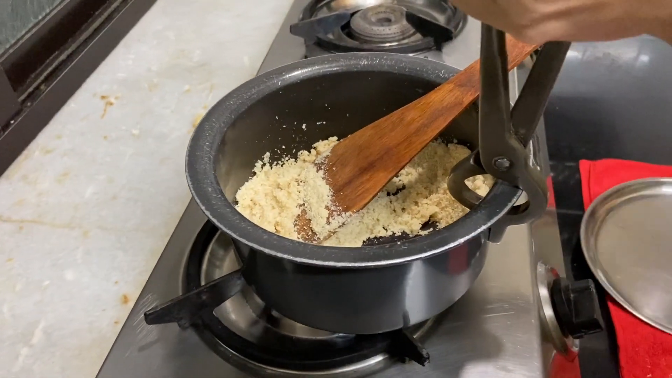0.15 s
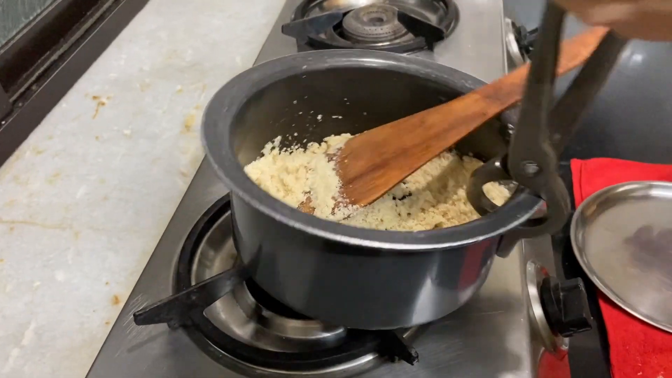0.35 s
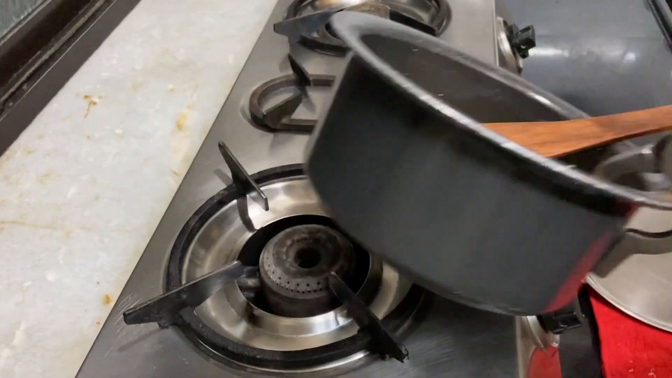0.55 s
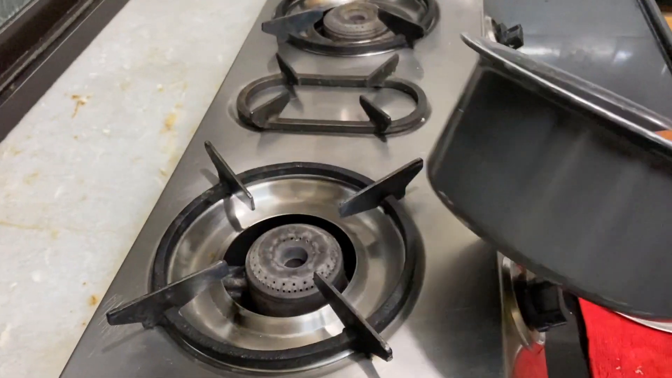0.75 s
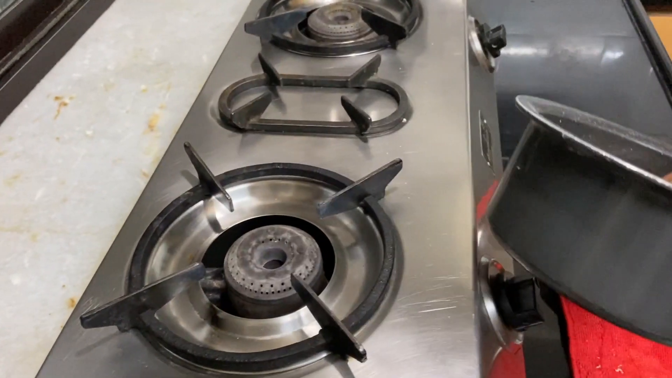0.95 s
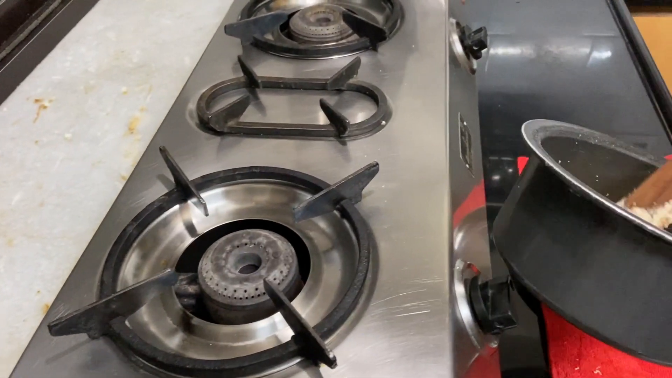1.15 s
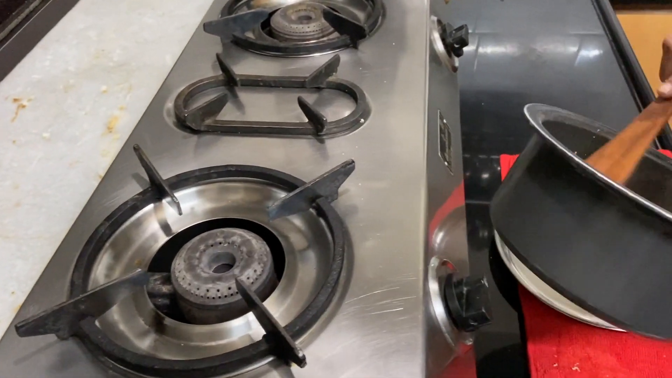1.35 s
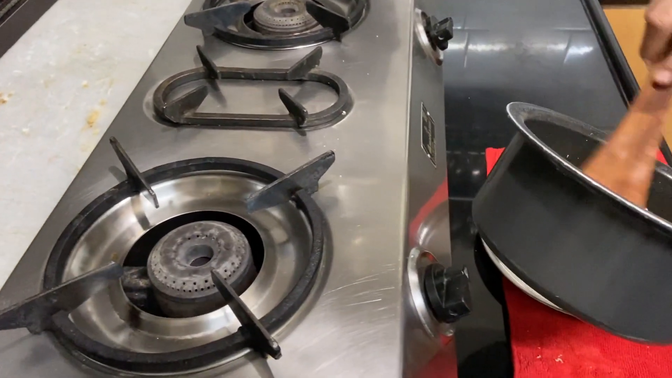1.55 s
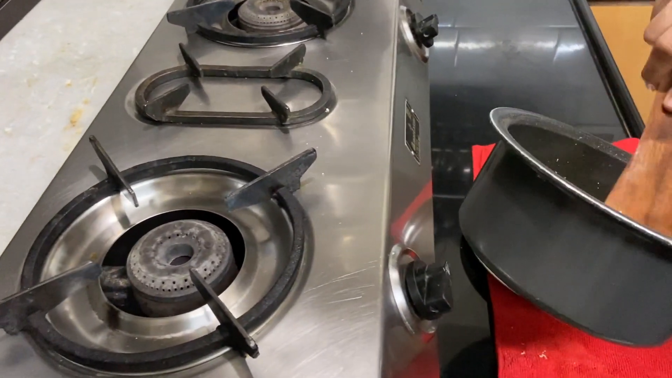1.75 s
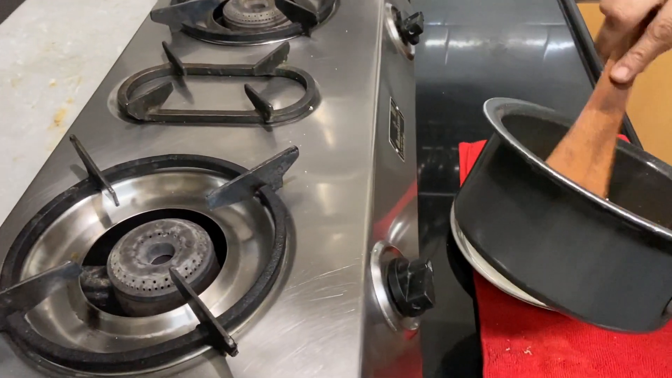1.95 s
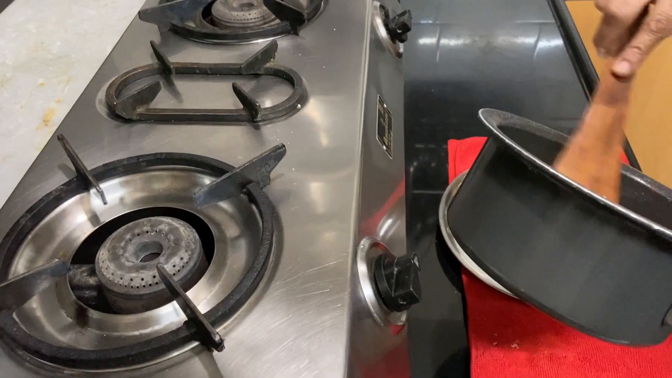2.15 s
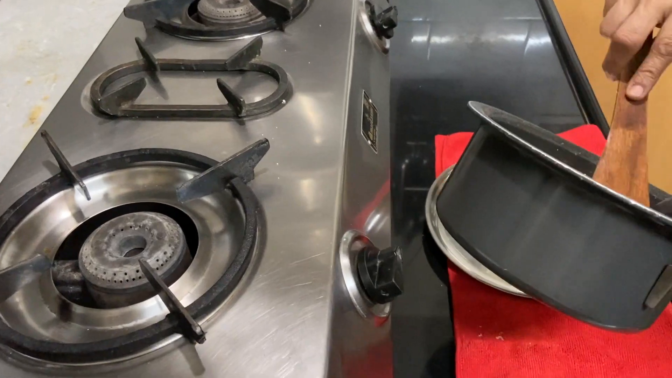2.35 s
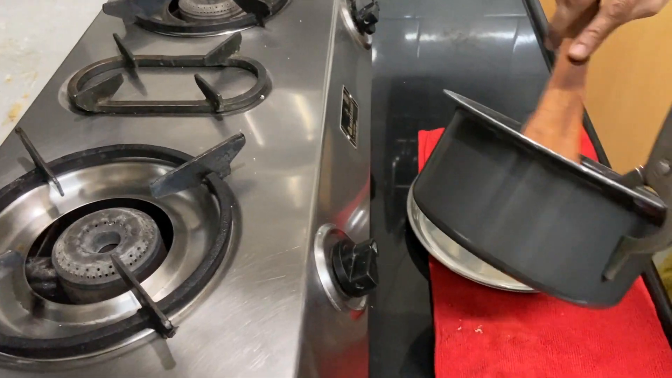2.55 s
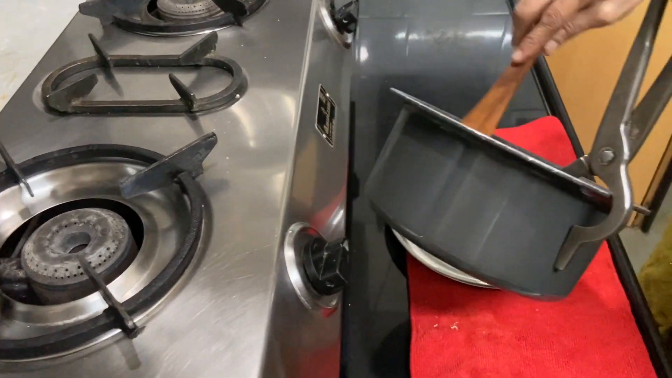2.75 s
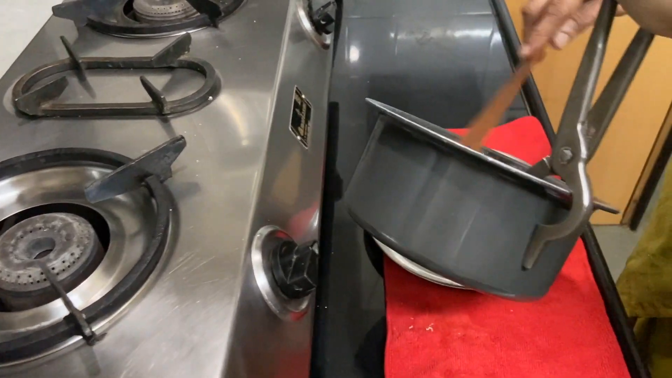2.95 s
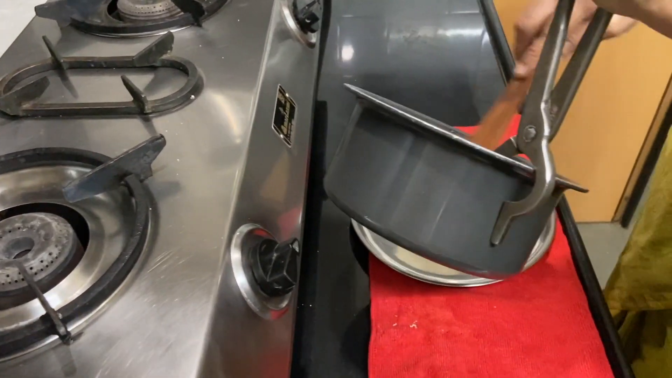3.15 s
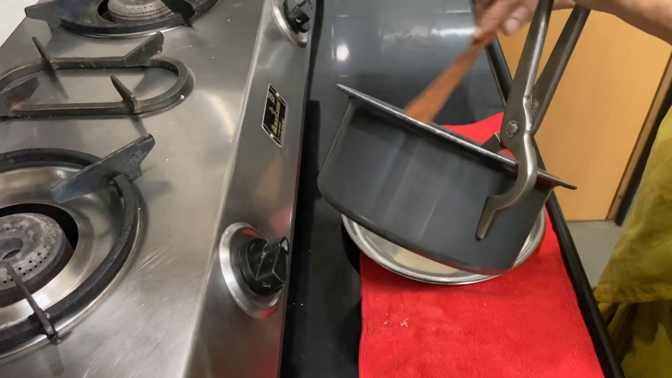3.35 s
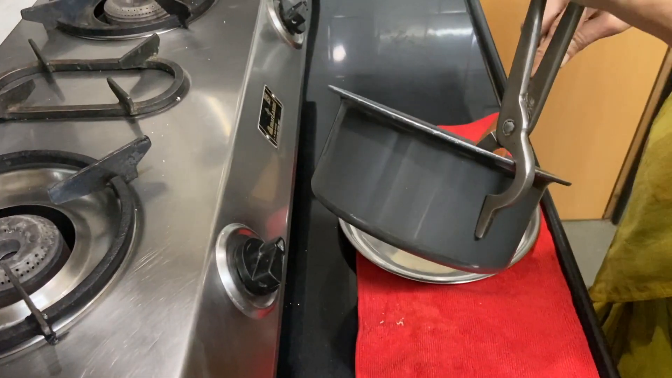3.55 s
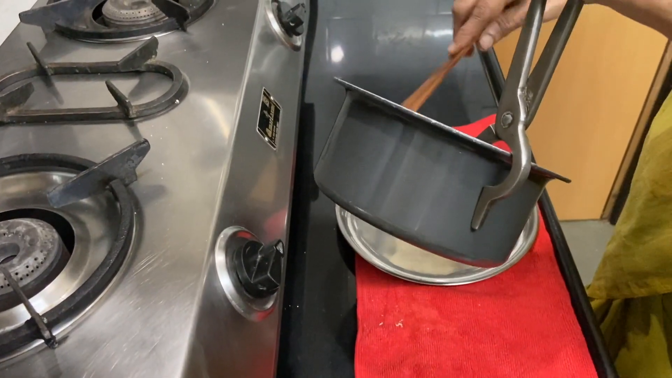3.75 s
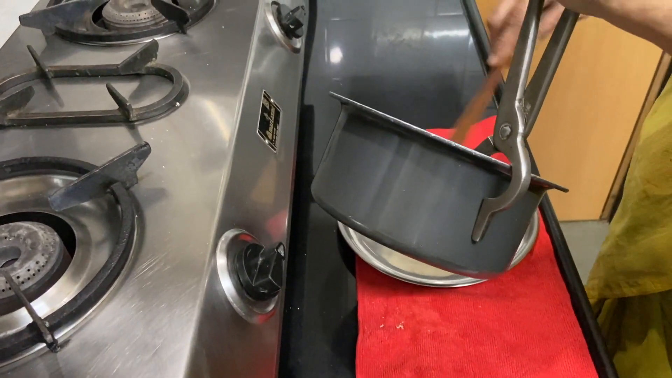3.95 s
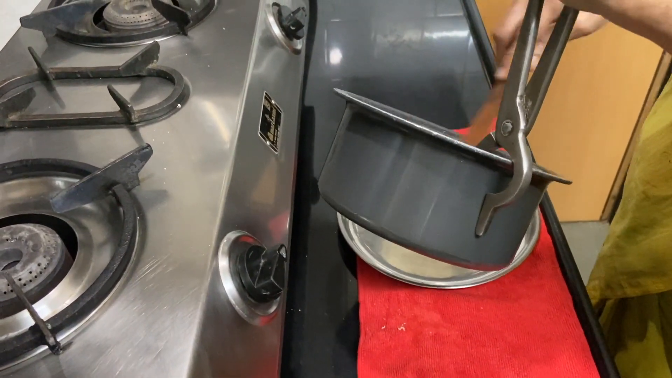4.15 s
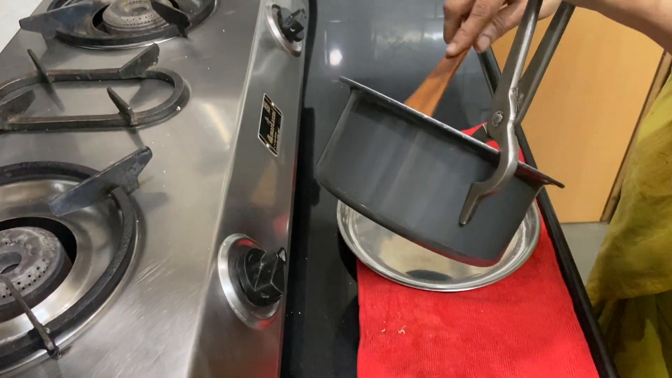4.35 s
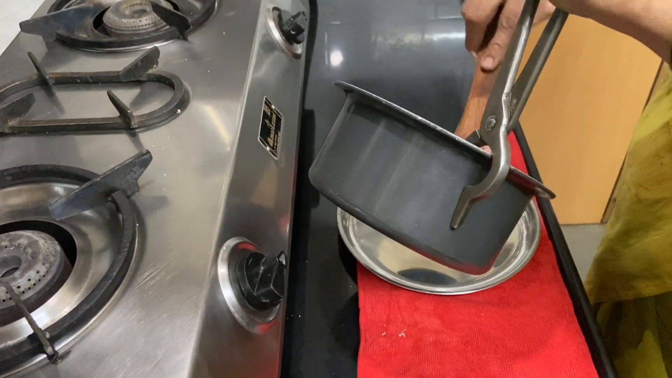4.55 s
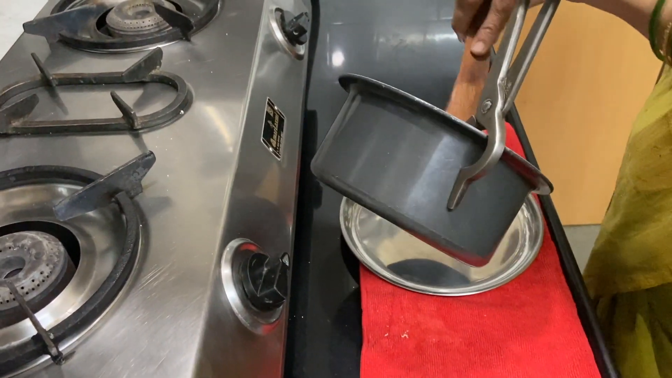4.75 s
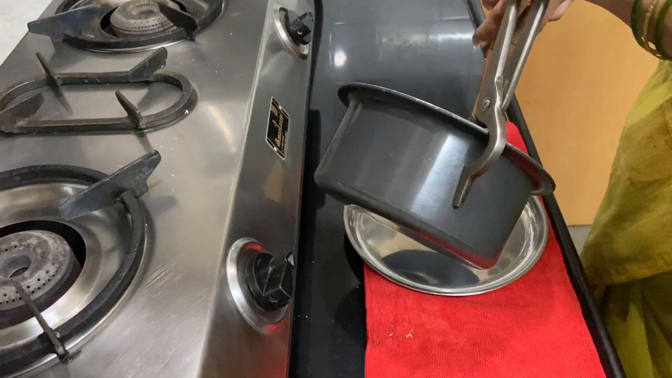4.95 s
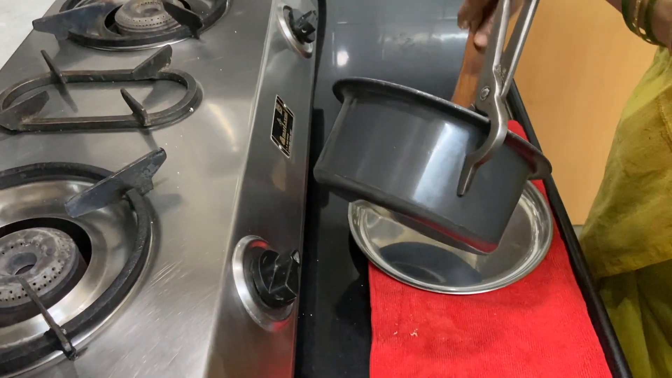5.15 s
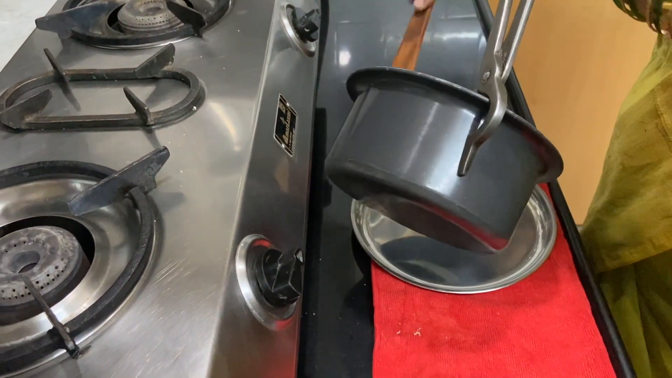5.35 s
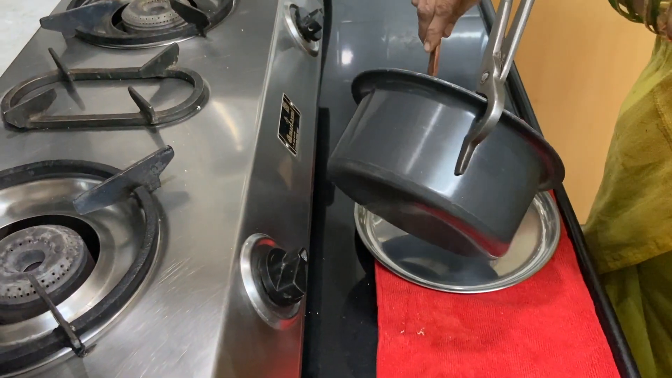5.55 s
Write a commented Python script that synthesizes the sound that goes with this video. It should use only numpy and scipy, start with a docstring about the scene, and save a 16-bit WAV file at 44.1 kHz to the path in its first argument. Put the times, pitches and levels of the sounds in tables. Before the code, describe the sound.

A wooden spatula scrapes dry, hissing grain from a thin metal pan in short strokes, with juddering, small squeaks and knocks in a quiet kitchen.

```python
"""Semolina scraped from a pan

A pan of roasted semolina is lifted off a gas stove with tongs and scraped out onto a steel plate in a small
kitchen, heard by a close pair of microphones. Strokes of a wooden spatula push hissing grain (filtered random
impacts), judder and squeak over the metal (slips driving damped modes) and knock on the pan wall (struck modes).
Between strokes pinches of grain patter down; kitchen air, handling rustle and a faint hum lie beneath."""
import sys
import numpy as np
from scipy import signal
from scipy.fft import rfft, irfft
from scipy.io import wavfile
from scipy.ndimage import uniform_filter1d

SR = 44100
rng = np.random.default_rng(int(sys.argv[2]) if len(sys.argv) > 2 else 0)


def unload_wav(signal):
    """Save mono or channel-first audio to the path in sys.argv[1] as 16-bit WAV at rate SR, clipped to [-1, 1]."""
    wavfile.write(
        sys.argv[1],
        SR,
        np.round(np.clip(np.atleast_2d(signal).T, -1, 1) * 32767).astype(np.int16),
    )


N = 247842
TIME, BINS = np.arange(N) / SR, np.fft.rfftfreq(N, 1 / SR)  # s, Hz

# Modes of the pan, damped by the tongs. Each row: pitch in Hz, relative level in dB, t60 in seconds.
PAN_MODES = [(291, -13, .22), (570, -4, .07), (738, 1, .17), (790, -5, .13), (1150, -7, .16),
             (1200, -6, .13), (1360, -13, .12), (1525, -9, .14), (1775, -12, .11), (1962, -6, .18),
             (2137, -7, .16), (2270, -9, .1), (2730, -13, .13), (2990, -12, .13), (3320, -7, .1),
             (3570, -9, .08), (4555, -12, .12), (4840, -12, .11), (4950, -11, .11), (5570, -11, .07),
             (6500, -11, .07), (6815, -8, .09), (7040, -8, .07)]
# Dense, short-lived vibration of blade and pan wall. Each row: frequency in Hz, relative density in dB per Hz.
CLATTER_SPECTRUM = [(30, -77), (110, -17.5), (220, 8), (450, 2.5), (750, 11), (1400, -5), (2100, 5),
                    (2600, -3), (3400, 2.5), (5000, -5.5), (8000, -14), (16000, -14.5)]


def gain_of(db):
    """Decibels are twenty times the logarithm of an amplitude ratio."""
    return 10 ** (np.asarray(db) / 20)


def evened(x):
    """Division by the root mean square gives unit power."""
    return x / np.sqrt(np.mean(x ** 2) + 1e-20)


def read(points, hz):
    """Interpolation of (Hz, value) rows on a logarithmic frequency axis."""
    f, value = np.transpose(points)
    return np.interp(np.log(hz + 1), np.log(f + 1), value)


def add(mix, s, sound):
    """Superposition: a sound starting at s seconds is summed into the mix."""
    part = mix[:, round(s * SR):][:, :sound.shape[1]]
    part += sound[:, :part.shape[1]]


def coloured(x, points, size=2048):
    """Minimum-phase filter: the Hilbert transform of the log gain (Hz, dB rows) supplies a causal phase."""
    log_gain = np.log(gain_of(read(points, abs(np.fft.fftfreq(size, 1 / SR)))))
    response = np.exp(np.conj(signal.hilbert(log_gain)))
    taps = np.fft.ifft(response).real
    return signal.fftconvolve(x, taps[None], axes=1)[:, :x.shape[1]]


def paired(x, points):
    """Partial coherence: two unrelated signals mix into a stereo pair of the given spectrum."""
    # Left-right likeness of the pair. Each row: frequency in Hz, likeness from 0 to 1.
    likeness = [(60, 0.97), (300, 0.74), (900, 0.18), (5600, 0.51), (7000, 0.42), (16000, 1)]
    a, b = rfft(x)
    same = np.clip(read(likeness, BINS), 0, 1)
    right = same * a + np.sqrt(1 - same ** 2) * b
    return evened(irfft(np.array([a, right]) * gain_of(read(points, BINS)), N))


def grit(per_s, spread_db, clump_db, count=N):
    """A random impact process: tiny blows of uneven size whose strength clumps over a few milliseconds."""
    clump_s = 0.0075
    slow_noise = signal.lfilter([1], [1, -np.exp(-1 / (clump_s * SR))], rng.standard_normal(count))
    clumps = np.clip(evened(slow_noise), -2, 2)
    unevenness = np.minimum(rng.exponential(1, count), 4)
    size = gain_of(spread_db * unevenness + clump_db * clumps)
    return rng.standard_normal((2, count)) * size * (rng.random(count) < per_s / SR)


def patchy(x, patchy_db):
    """Patchy noise: random patches of time and frequency, a few hundredths of a second long, vary in level."""
    z = signal.stft(x, SR, nperseg=256)[2]
    patches = uniform_filter1d(rng.standard_normal(z.shape[1:]), size=6, axis=0)  # across frequency
    patches = evened(uniform_filter1d(patches, size=8, axis=1))  # across time
    return evened(signal.istft(z * gain_of(patchy_db * patches), SR, nperseg=256)[1][:, :N])


def contact(x, hz, slope):
    """Contact filtering: where and how hard surfaces meet favours one pitch; the rest falls by the octave."""
    knee = .15  # octaves over which the peak is rounded
    points = []
    for f in np.geomspace(SR / 2 ** 10, SR / 2, num=120):
        octaves = np.hypot(np.log2(f / hz), knee)
        points.append((f, max(-abs(slope) * octaves, -70)))
    return coloured(x, points)


def ringing(modes, apart):
    """Modal decay after one tap; each mode reaches the two microphones with its own strength and phase."""
    t = np.arange(SR // 4) / SR
    skew = apart * rng.uniform(-0.43, 1, (len(modes), 1, 1)) * [[1], [-1]]
    ring = 0
    for (hz, db, t60), phase in zip(modes, skew):
        onset = 1 - np.exp(-2 * hz * t)
        ring = ring + gain_of(db - 60 * t / t60) * (1 + phase / 2) * np.sin(2 * np.pi * hz * t + phase) * onset
    # small things radiate no deep bass
    return evened(signal.sosfilt(signal.butter(2, 130, "high", fs=SR, output="sos"), ring))


def body(modes, dense, dense_db, dense_t60, crack):
    """Impulse response of a metal body: separate modes, a crack and a short dense clatter."""
    t = np.arange(SR // 4) / SR
    noise = rng.standard_normal(len(t)) + rng.standard_normal((2, len(t)))
    clatter = evened(noise * gain_of(-60 * t / dense_t60))
    impulse = evened(1. * (t == 0))
    short = evened(coloured(clatter + crack * impulse, dense))
    return ringing(modes, apart=1.0) + gain_of(dense_db) * short


def rubs(rows, modes, dense, dense_db, dense_t60, rise_s, fade_db):
    """Stick-slip friction: irregular slips under changing pressure drive the modes of a metal body."""
    loading = 0.013  # the place of contact shifts the body's pitches by up to this share
    out = np.zeros((2, N))
    for s, length, db, hz, slope in rows:
        count = int(np.clip(length * SR, 64, SR // 4))
        t = TIME[:count]
        pressure = np.minimum(t / rise_s, 1) * gain_of(-fade_db * t / length)
        pressure = pressure * signal.windows.tukey(count, .1)
        slips = grit(per_s=5000, spread_db=1.2, clump_db=2, count=SR // 4)[:1, :count] * pressure
        shift = 1 + loading * rng.uniform(-0.99, 1)
        loaded = [(f * shift, level, t60) for f, level, t60 in modes]
        answer = body(loaded, dense, dense_db, dense_t60, crack=0.1)
        sound = contact(signal.fftconvolve(slips, answer, axes=1), hz, slope)
        rms = np.sqrt(np.sum(sound ** 2) / (2 * count))  # total energy spread over the contact time
        add(out, s, gain_of(db) * sound / rms)
    return out


def background():
    """Stationary noise for the kitchen air, and a low handling rustle whose power rises with each move."""
    # The quiet kitchen. Each row: frequency in Hz, relative density in dB per Hz.
    air_spectrum = [(15, -87.5), (25, -22), (92, -11), (134, -57.5), (161, 0.5), (285, -6.5), (326, -32.5),
                    (463, -24.5), (545, -8.5), (1560, -20), (2220, -22), (6380, -31.5), (6920, -27),
                    (8590, -40), (16000, -33.5)]
    # Rustle of hands and tongs. Each row: frequency in Hz, relative density in dB per Hz.
    rustle_spectrum = [(30, -24), (80, 7), (170, 5), (300, 2.5), (600, -4), (1200, -15), (16000, -28)]
    # Hands and tongs at work. Each row: start in seconds, length in seconds, level in dB before the waver.
    moves = [(-.1, 0.74, -65.5), (1.28, 5.84, -67), (2.707, 0.52, -64.5), (3.534, 0.43, -61),
             (4.043, 0.5, -72)]
    hold_db, ramp_s, waver_db = -74.5, 0.068, 1  # just holding the pan; ease in and out; unevenness
    air = gain_of(-74.0) * paired(rng.standard_normal((2, N)), air_spectrum)
    power = gain_of(hold_db) ** 2
    for s, length, db in moves:
        ramp = np.clip(np.minimum(TIME - s, s + length - TIME) / ramp_s, 0, 1)
        power = power + (gain_of(db) * ramp) ** 2
    rates = np.geomspace(2, 10, num=8)  # Hz
    waver = evened(sum(np.sin(2 * np.pi * (per_s * TIME + rng.random())) for per_s in rates))
    rustle = paired(rng.standard_normal((2, N)), rustle_spectrum)
    return air + np.sqrt(power) * gain_of(waver_db * waver) * rustle


def hum():
    """Steady sinusoids of a faint appliance hum, alike at both microphones."""
    # Each row: frequency in Hz, RMS level in dB.
    lines = [(96.9, -77.5), (172.3, -88.5), (199.2, -76)]
    return sum(np.sqrt(2) * gain_of(db) * np.sin(2 * np.pi * (hz * TIME + rng.random())) for hz, db in lines)


def spills():
    """Granular impacts with exponential decay: a pinch of grain lands together, then stragglers trickle."""
    # Pinches of grain landing. Each row: start in seconds, level in dB ahead of the bowl, t60 in seconds.
    pinches = [(.203, -56.5, 0.096), (.292, -51.5, 0.11), (.485, -58, 0.039), (1.202, -53, .11),
               (1.898, -49, 0.19), (1.97, -35, 0.11), (2.206, -47.5, 0.12), (2.22, -34, 0.18),
               (2.512, -37.5, 0.15), (2.62, -35.5, 0.16), (2.662, -47, .13), (2.903, -48, 0.048),
               (3.322, -45.5, .13), (3.455, -37, 0.28), (3.672, -42.5, 0.13), (3.942, -50.5, 0.03),
               (4.009, -49, 0.15), (4.314, -49.5, .13), (4.589, -40, 0.021), (5.507, -34, 0.19)]
    # Patter of landing grain. Each row: frequency in Hz, relative density in dB per Hz.
    patter_spectrum = [(300, -40), (1500, -23.5), (4000, -20.5), (7000, -9), (9000, -8), (11000, -1),
                       (16000, -1)]
    flow = np.zeros(N)
    for s, db, t60 in pinches:
        rise = 0.067 * t60  # the pinch lands in this share of its dying time
        flow += np.clip((TIME - s) / rise, 0, 1) * gain_of(db - 60 * np.maximum(TIME - s - rise, 0) / t60)
    patter = paired(grit(per_s=6000, spread_db=2.0, clump_db=1.9), patter_spectrum)
    return flow * patchy(patter, patchy_db=1.5)


def knocks():
    """Impact excitation: single blows set off the pan's modes, each scaled by its first 20 ms."""
    # Wood and tongs on the pan. Each row: start in seconds, level over the first 20 ms in dB ahead of the
    # stereo balance, strongest pitch in Hz, fall-off in dB per octave.
    blows = [(.2664, -56.5, 9400, 14.5), (.5095, -54.5, 11500, 25), (1.9731, -33.5, 600, 16.5),
             (2.2705, -40.5, 3360, 7), (2.6245, -48.5, 1500, 1.5), (2.6339, -36, 650, 8),
             (2.7672, -33, 1220, 3), (3.7975, -35, 3330, 3), (3.808, -38.5, 474, 14.5),
             (4.3945, -32, 1060, 6.5), (5.4827, -25, 2840, 5.5)]
    out = np.zeros((2, N))
    for s, db, hz, slope in blows:
        hit = body(PAN_MODES, CLATTER_SPECTRUM, dense_db=6.0, dense_t60=.032, crack=0.32)
        hit = contact(hit, hz, slope)
        add(out, s, gain_of(db) * hit / hit[:, :SR // 50].std())
    return out


def drags():
    """Friction-driven modes: the pan drags over the burner grate as it lifts, and later shifts on the plate."""
    # Each row: start in seconds, length in seconds, level in dB, strongest pitch in Hz,
    # fall-off in dB per octave.
    rows = [(.32, 0.037, -56, 890, 4), (.34, 0.041, -43.5, 304, 6), (.365, 0.04, -37, 365, 8),
            (.422, 0.014, -36, 432, 24), (.443, 0.016, -40, 430, 26), (.454, 0.039, -52, 442, 44),
            (3.62, .13, -63, 196, 11)]
    # Modes of the grate and stove top. Each row: pitch in Hz, relative level in dB, t60 in seconds.
    grate_modes = [(173, -5, .1), (280, -1, .12), (359, 0, .1), (441, -1, .2), (540, -5, .06),
                   (620, -5, .07), (690, -9, .06)]
    # Dense low vibration. Each row: frequency in Hz, relative density in dB per Hz.
    thud_spectrum = [(40, -13), (150, -8), (350, -10), (650, -24.5), (900, -28), (2000, -41), (16000, -51)]
    return rubs(rows, grate_modes, thud_spectrum, dense_db=2.0, dense_t60=0.073, rise_s=0.0056, fade_db=3)


def push(start, length, rise, db, sag_db):
    """Envelope of a driven flow: the blade speeds up, the heap thins out, and the grain settles after."""
    release_t60 = .15  # s
    t = np.maximum(TIME - start, 0)
    held = np.clip((t - rise) / max(length - rise, 1 / SR), 0, 1)
    settling_db = 60 * np.maximum(t - length, 0) / release_t60
    return np.minimum(t / rise, 1) ** 2 * gain_of(db - sag_db * held - settling_db)


def sliding_grain():
    """Granular flow: grain ahead of the blade fizzes and crunches, and its many impacts make the pan sing."""
    # Pushes of the blade. Each row: start, length and rise in seconds, fizz level, crunch level
    # and sag over the push in dB, levels ahead of the bowl.
    pushes = [(1.077, 0.046, 0.035, -50.5, -53.5, 1.5), (1.327, 0.1, 0.038, -43, -50, 4.5),
              (1.426, 0.17, 0.033, -45, -51.5, 9.5), (1.652, 0.037, 0.027, -41, -44, 3),
              (1.739, 0.073, 0.014, -38, -47, 10.5), (2.008, 0.11, 0.037, -44, -52.5, 5.5),
              (2.265, 0.038, .006, -44, -45, 8.5), (2.295, 0.14, 0.011, -34, -39, 20),
              (2.684, 0.22, 0.056, -38, -38.5, 29.5), (3.08, 0.036, 0.022, -44.5, -45.5, 4),
              (3.118, 0.13, 0.04, -42, -44, 5.5), (3.431, .145, 0.055, -47, -50.5, -2),
              (3.752, 0.18, 0.028, -41, -43.5, 19), (4.06, 0.048, 0.029, -43.5, -45, 7),
              (4.105, 0.13, 0.032, -39, -45, 16), (4.402, 0.14, 0.08, -46.5, -51, 0),
              (4.702, 0.052, 0.021, -56.5, -61, -3.5), (4.739, 0.1, 0.021, -33, -41, 13.5),
              (4.814, 0.049, 0.01, -28.5, -38, 2), (4.83, 0.16, 0.017, -28, -50.5, 1),
              (4.889, 0.1, 0.046, -27.5, -32.5, -1.5), (4.996, 0.096, 0.016, -29.5, -43, 8.5),
              (5.174, 0.13, 0.019, -81.5, -78.5, -2), (5.42, .12, 0.029, -47, -45, 5.5)]
    # Fine fizz, then coarse crunch. Each row: frequency in Hz, relative density in dB per Hz.
    fizz_spectrum = [(300, -37), (900, -20), (2800, -20.5), (5000, -8.5), (6000, -8), (7000, 4.5),
                     (7800, -1), (9000, -3), (11000, 2.5), (12500, -2.5), (16000, -1)]
    crunch_spectrum = [(500, -46), (1500, -15), (2200, -4.5), (2800, -12), (3400, -0.5), (4100, -1),
                       (4900, -0.5), (5600, 0), (7000, -3.5), (16000, -35.5)]
    fine, coarse = np.zeros((2, N))
    for start, length, rise, fizz_db, crunch_db, sag_db in pushes:
        fine = np.maximum(fine, push(start, length, rise, fizz_db, sag_db))
        coarse = np.maximum(coarse, push(start, length, rise, crunch_db, 0.99 * sag_db))
    fizz = paired(grit(per_s=16000, spread_db=1.3, clump_db=1.84), fizz_spectrum)
    fizz = fine * patchy(fizz, patchy_db=3.5)
    crunch = paired(grit(per_s=11000, spread_db=2.8, clump_db=2.4), crunch_spectrum)
    crunch = coarse * patchy(crunch, patchy_db=2.0)
    # larger roasted crumbs crack under the blade
    crumbs = paired(grit(per_s=590, spread_db=3.5, clump_db=1.5), crunch_spectrum)
    crunch = crunch + gain_of(-10.5) * coarse * crumbs
    ring = ringing(PAN_MODES, apart=0.94)
    singing = signal.fftconvolve((fizz + crunch)[:1], ring / np.linalg.norm(ring[0]), axes=1)[:, :N]
    # the moving blade and the shifting heap load the pan, so its pitches wander by a few percent
    wander = np.zeros(N)  # time shift in s
    for per_s in (1.3, 2.9, 7.1):
        wander += .02 / (2 * np.pi * per_s) * np.sin(2 * np.pi * (per_s * TIME + rng.random()))
    singing = np.array([np.interp(TIME + wander, TIME, channel) for channel in singing])
    return fizz + crunch + gain_of(-8) * singing


def squeaks():
    """Selective friction: as the blade runs up the wall, slips favour one pitch and a band below its octave."""
    # Each row: start in seconds, length in seconds, level in dB ahead of the stereo balance, pitch in Hz,
    # level of the upper band relative to it in dB.
    squeak_rows = [(1.094, 0.048, -48.5, 1156, -8.5), (3.144, 0.14, -53, 3660, -10),
                   (3.197, 0.038, -44.5, 1274, 3.5), (3.354, 0.085, -63.5, 890, -16),
                   (3.506, 0.043, -48.5, 3300, -24), (3.55, 0.033, -42, 1194, -5),
                   (3.858, 0.057, -37.5, 1288, -6), (4.177, 0.046, -43, 1200, -15),
                   (4.208, 0.033, -46.5, 1200, 1), (4.839, 0.031, -34.5, 4830, -20),
                   (4.92, 0.031, -35.5, 1580, -13), (4.975, 0.063, -43.5, 3550, -15)]
    upper_ratio, slope = 1.685, 39.5  # upper band over pitch; fall-off in dB per octave
    rows = []
    for s, length, db, hz, upper_db in squeak_rows:
        rows.append((s, length, db, hz, slope))
        rows.append((s, length, db + upper_db, hz * upper_ratio, slope))
    return rubs(rows, PAN_MODES, CLATTER_SPECTRUM, dense_db=7, dense_t60=0.065, rise_s=0.014, fade_db=7)


def judders():
    """Stick-slip chatter: the blade catches on the wall, and its force thumps the pan against the plate."""
    # Each row: start in seconds, length in seconds, level in dB ahead of the stereo balance,
    # strongest pitch in Hz, fall-off around it in dB per octave (sign ignored).
    catches = [(1.363, .2, -57.5, 657, 4), (1.672, 0.083, -59.5, 900, -5), (1.75, 0.052, -50.5, 830, -1),
               (2.028, 0.057, -46.5, 810, 13), (2.303, 0.055, -30.5, 1030, 15),
               (2.63, 0.22, -49, 710, 15.5), (2.766, 0.057, -40.5, 750, 3.5),
               (2.793, 0.092, -47.5, 2080, 12), (3.1, 0.091, -54, 670, 10), (3.462, .13, -52.5, 615, 11.5),
               (3.771, 0.076, -52.5, 745, 3.5), (3.801, 0.048, -39, 484, 29),
               (4.076, 0.08, -37.5, 848, 7.5), (4.111, 0.096, -41, 750, 9), (4.4, 0.086, -42, 616, 7.5),
               (4.754, 0.086, -45.5, 765, 3), (4.828, 0.021, -40, 596, 17.5),
               (5.39, 0.022, -59.5, 1560, 32.5), (5.404, 0.065, -39.5, 810, 6),
               (5.422, 0.036, -38, 1400, 16), (5.448, 0.058, -43.5, 2130, 14),
               (5.488, 0.083, -33.5, 1720, 6.5)]
    thump_hz, thump_db, thump_slope = 330, -22, 17.5  # Hz; dB relative to the judder; dB per octave
    thumps = [(s, length, db + thump_db, thump_hz, thump_slope) for s, length, db, _, _ in catches]
    # a judder starts hard and eases as the blade gets going
    return rubs(catches + thumps, PAN_MODES, CLATTER_SPECTRUM,
                dense_db=7, dense_t60=.018, rise_s=0.0024, fade_db=20)


def bowl(x):
    """Comb filtering: quick reflections between the pan walls and the plate interfere with the hiss."""
    t = np.arange(SR // 20) / SR
    taps = rng.standard_normal(len(t)) + .5 * rng.standard_normal((2, len(t)))
    taps = taps * gain_of(-60 * t / .05) * (t > .0006)
    walls = (t == 0) + .7 * taps / np.linalg.norm(taps[0])
    return signal.fftconvolve(x, walls / np.linalg.norm(walls[0]), axes=1)[:, :N]


def kitchen(x):
    """Reverberation: dense reflections from counter and walls decay at a rate set by frequency."""
    # Each row: frequency in Hz, t60 in seconds.
    decay = [(150, 0.21), (700, 0.22), (2000, 0.19), (6000, 0.19), (16000, 0.19)]
    taps = rng.standard_normal((2, SR // 2)) * (rng.random((2, SR // 2)) < 3000 / SR)
    taps[:, :int(.004 * SR)] = 0  # no reflection before 4 ms
    hz, t, z = signal.stft(taps, SR, nperseg=256)
    tail = signal.istft(z * gain_of(-60 * t / read(decay, hz)[:, None]), SR, nperseg=256)[1]
    return signal.fftconvolve(x, tail / np.linalg.norm(tail[0]), axes=1)[:, :N]


def scene():
    """Superposition of direct sounds, their reverberation and the steady background."""
    balance = gain_of([[.7], [-.7]])  # dB, a little to the left
    pan = (judders() + squeaks() + knocks()) * balance
    grate = drags()
    grain = bowl(sliding_grain() + spills())
    echoes = kitchen(gain_of(-7) * pan + gain_of(-14) * (grate + grain))
    return pan + grate + grain + echoes + background() + hum()


def record(dry):
    """Interchannel phase: the treble locks in or out of phase, wide only in between; then a band limit."""
    # Phase between the microphones. Each row: frequency in Hz, lag of the right in turns (negative leads).
    right_lag = [(7400, 0), (8600, -.5), (9400, -.5), (10700, -1), (11700, -1), (12800, -1.5),
                 (13700, -1.5), (14900, -2)]
    left, right = rfft(dry)
    lag = 2 * np.pi * read(right_lag, BINS)
    least_width = read([(6000, 1), (6900, .3), (8600, .12), (16000, .12)], BINS)
    width = np.maximum(least_width, abs(np.sin(lag)))
    mid, side = (left + right) / 2, width * (left - right) / 2
    pair = irfft(np.array([mid + side, (mid - side) * np.exp(-1j * lag)]), N)
    low_pass = signal.firwin(511, 15850, window=("kaiser", 9), fs=SR)  # edge in Hz
    return signal.oaconvolve(pair, low_pass[None], "same")


dry = scene()
out = record(dry)
unload_wav(out)
```